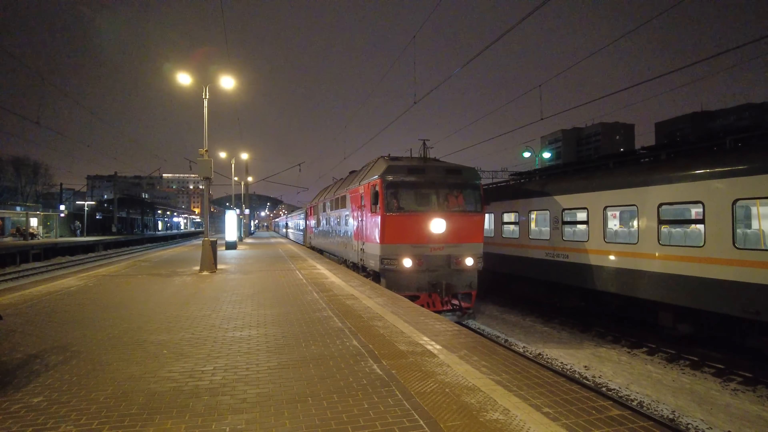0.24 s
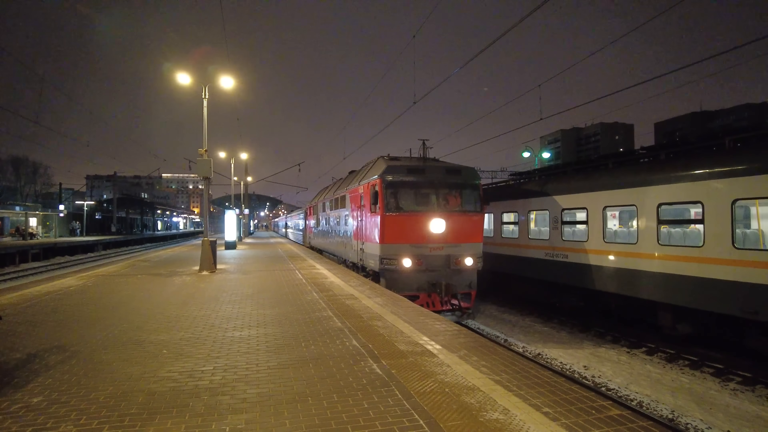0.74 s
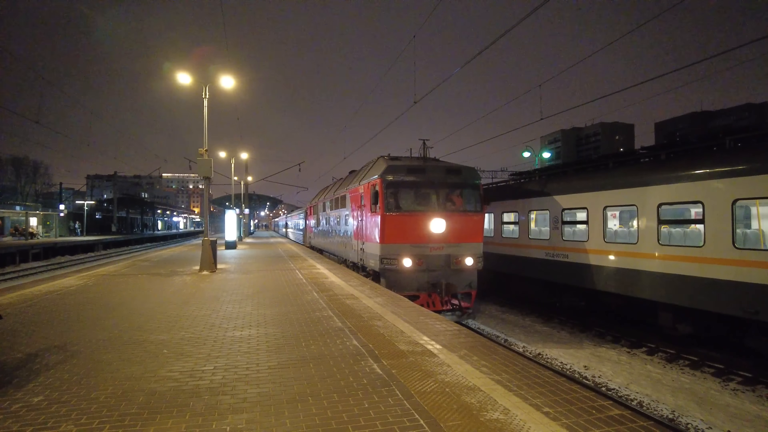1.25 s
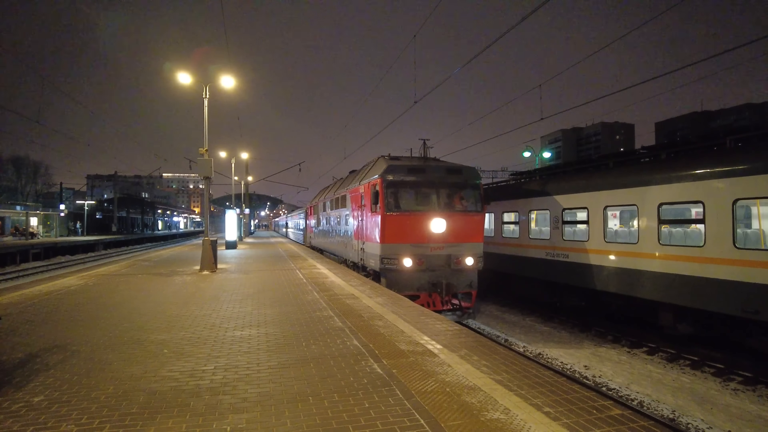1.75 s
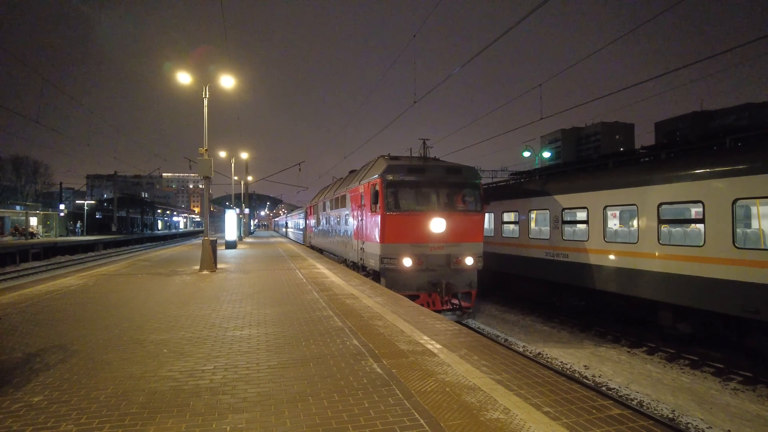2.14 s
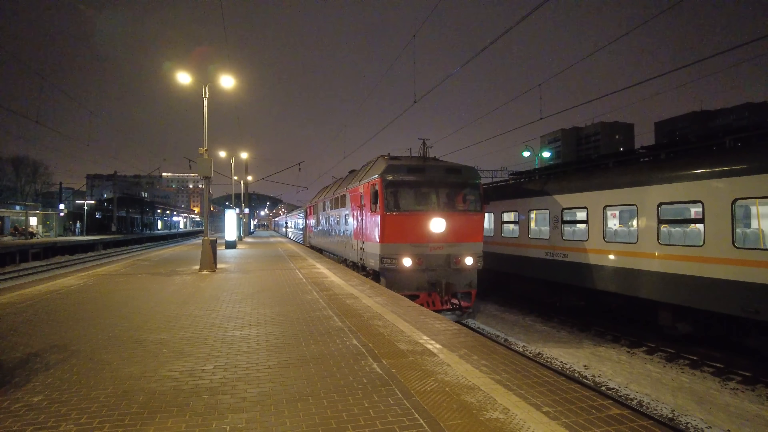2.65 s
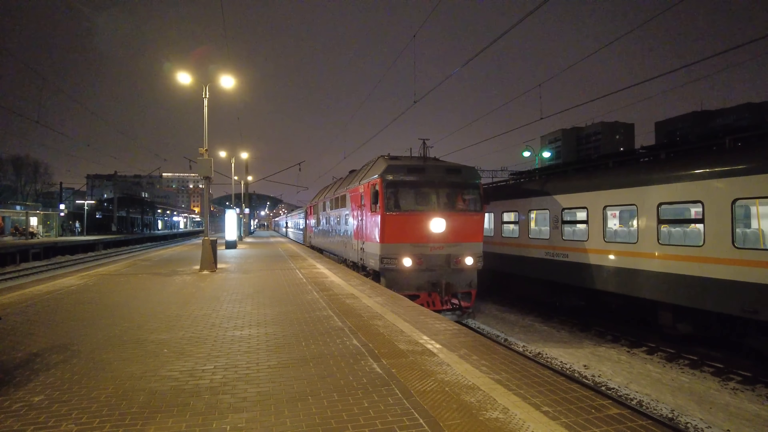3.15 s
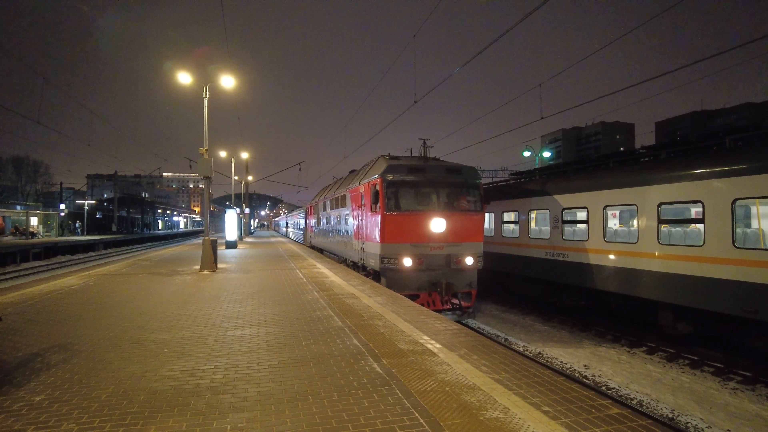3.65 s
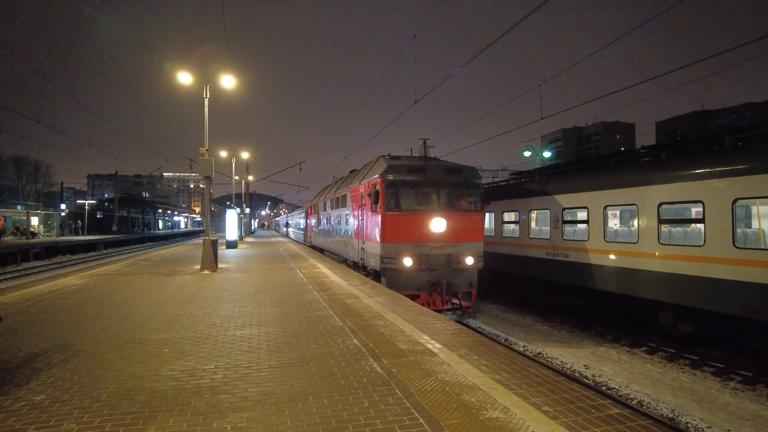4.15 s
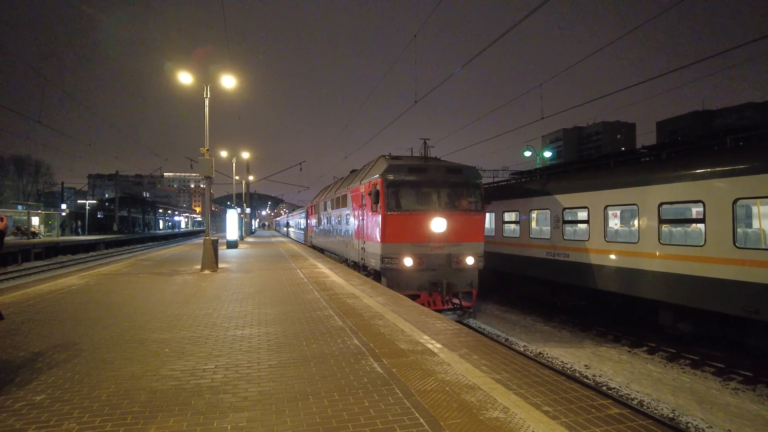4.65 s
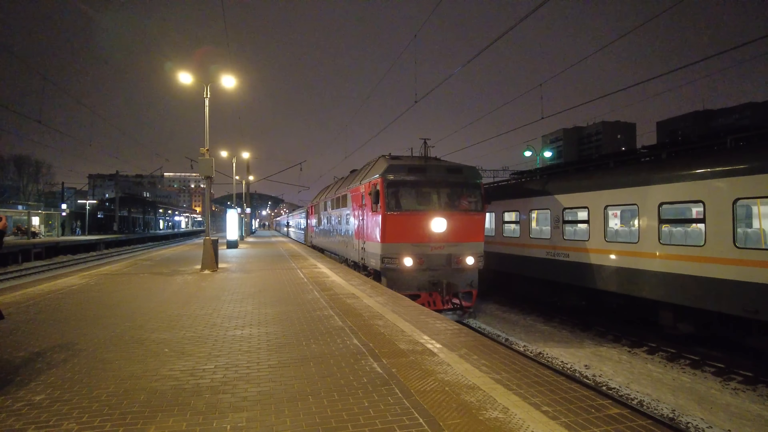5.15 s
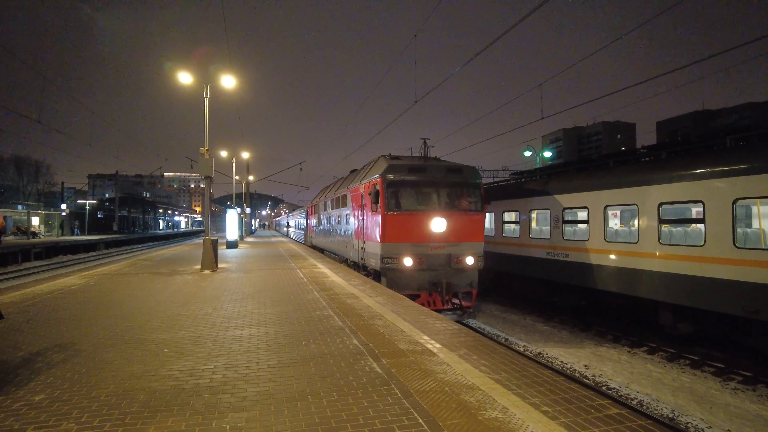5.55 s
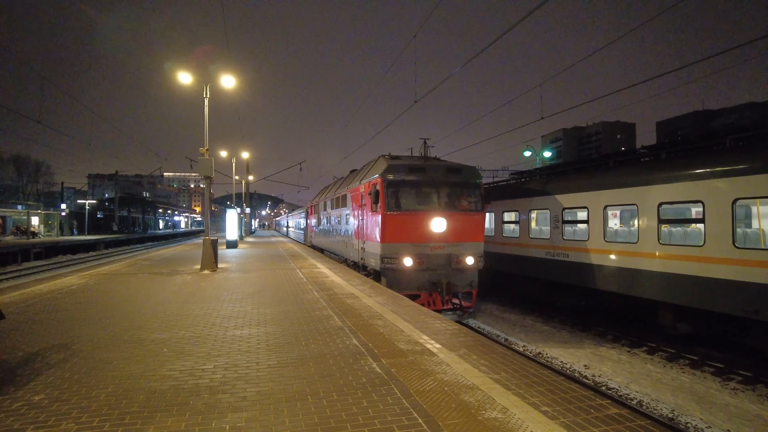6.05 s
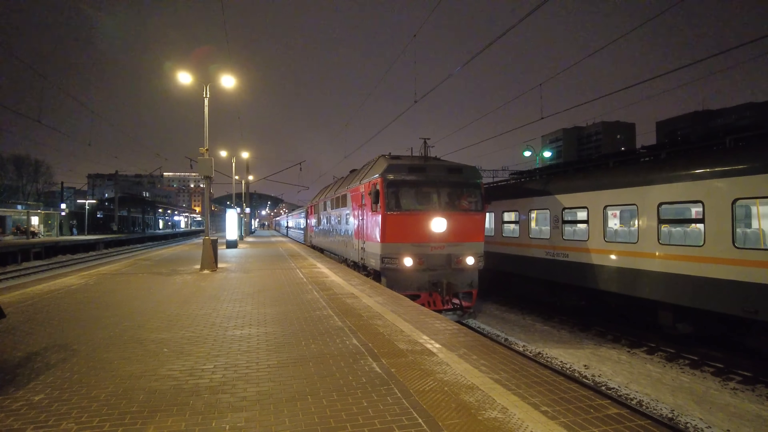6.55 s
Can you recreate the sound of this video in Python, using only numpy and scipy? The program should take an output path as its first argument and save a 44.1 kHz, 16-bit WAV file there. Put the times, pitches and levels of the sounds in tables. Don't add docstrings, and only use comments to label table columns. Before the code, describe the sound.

A diesel locomotive idles with a deep uneven throb while compressed air hisses out early, slowly dying away before scattered valve ticks and puffs.

```python
import sys
import numpy as np
from scipy import signal
from scipy.fft import rfft, irfft
from scipy.io import wavfile
from scipy.ndimage import uniform_filter1d

SR = 44100
rng = np.random.default_rng(int(sys.argv[2]) if len(sys.argv) > 2 else 0)


def transcribe(u):
    v = np.clip(np.atleast_2d(u).T, -1, 1)
    q = np.round(v * 32767).astype(np.int16)
    wavfile.write(sys.argv[1], SR, q)


def how_loud(loudness_db):
    steps = np.asarray(loudness_db, float) / 20
    return 10 ** steps


N = 299880
TIME = np.arange(N) / SR

# (place in firing order, level [dB])
CYLINDERS = [(1, -0.2), (2, 1.5), (3, 0.7), (4, -3.3), (5, -0.3), (6, -0.7), (7, -0.9), (8, 0.9), (9, -2.4),
             (10, 0.5), (11, 2.9), (12, 0.8), (13, 1.5), (14, -1.3), (15, 1.0), (16, -3.2)]
# (frequency [Hz], correlation [0-1])
AIR_LIKENESS = [(60, 0.93), (120, 0.92), (240, 0.75), (480, 0.7), (950, 1), (1890, 0.79), (3770, 0.65),
                (7520, 0.31), (15000, 0.12)]


def evened(x):
    return x / np.sqrt(np.mean(x ** 2) + 1e-20)


def read(points, hz):
    f, value = np.transpose(points)
    return np.interp(np.log(hz + 1), np.log(f + 1), value)


def curves(rows, ahead_s=0):
    s, *columns = np.transpose(rows)
    return [np.interp(TIME + ahead_s, s, column) for column in columns]


def rise(start_s, span_s):
    return 1 - np.exp(-np.maximum(TIME - start_s, 0) / span_s)


def bump(s, half_s):
    return np.exp(-((TIME - s) / half_s) ** 2)


def drift(top_hz):
    hz = np.geomspace(top_hz / 12, top_hz, num=12)[:, None]
    t = np.arange(N // 200 + 2) * 200 / SR
    waves = np.sin(2 * np.pi * (hz * t + rng.random(hz.shape))) / np.sqrt(hz)
    return np.interp(TIME, t, evened(waves.sum(0)))


def resonate(x, hz, width_hz):
    return signal.lfilter(*signal.iirpeak(hz, hz / width_hz, SR), x)


def noise(spectrum, likeness, patchy_db, size=1024):
    frames, hz = 4 * N // size + 5, np.fft.rfftfreq(size, 1 / SR)
    a, b, c, d, patches = rng.standard_normal((5, len(hz), frames))
    patches = uniform_filter1d(patches, size=10, axis=0)
    patches = evened(uniform_filter1d(patches, size=10, axis=1))
    same = np.clip(read(likeness, hz), -1, 1)[:, None]
    left, other = a + 1j * b, c + 1j * d
    z = np.array([left, same * left + np.sqrt(1 - same ** 2) * other])
    z *= how_loud(read(spectrum, hz)[:, None] + patchy_db * patches)
    return evened(signal.istft(z, nperseg=size, noverlap=3 * size // 4)[1][:, :N])


def exhaust(throb, cycles, shaft, speed, fuel_db, heard_db):
    # (multiple of the cycle, level before the surge [dB], level after it [dB])
    weak_orders = [(4, -48, -48), (5, -49, -49), (6, -45, -43), (7, -35, -33), (8, -48, -38),
                   (10, -31.5, -34.5), (11, -40, -50), (12, -32, -37), (14, -47, -34), (15, -33, -38),
                   (16, -41, -37), (17, -33, -40), (18, -35, -45), (19, -41, -45), (20, -38, -34.5),
                   (21, -45, -48), (23, -44, -39), (24, -44.5, -41), (25, -43, -40), (26, -46, -44)]
    # (time [s], half length [s], level [dB])
    hum_swells = [
        (.9, .2, 3),
        (2.5, .2, 4),
        (3.405, .4, 2.5),
        (4.3, .2, 2),
        (5.2, .6, -3.5),
        (6.5, 0.42, -4.5),
    ]
    idle_speed, surge_s = 2.951, 3.9
    phases = np.angle(np.fft.fft(how_loud(np.transpose(CYLINDERS)[1])))

    pulse_db = -27.5 + .3 * fuel_db + 4 * rise(4.75, .1) - 5 * bump(surge_s, 0.67) + 0.69 * drift(3.0)
    bark_db = -42 + 8 * rise(2.8, .1) - 8 * bump(3.8, 0.24) + 1.0 * drift(1.6)
    hum_db = -46 + 61 * (speed - idle_speed) + 1.5 * drift(3.5)
    hum_db += sum(db * bump(s, half_s) for s, half_s, db in hum_swells)

    out = how_loud(hum_db) * np.cos(2 * np.pi * 50 * shaft + .5 * drift(5.0))
    out += how_loud(-17.5 + heard_db) * np.cos(2 * np.pi * 9 * throb + phases[9])
    for k, db in ((13, pulse_db), (22, bark_db)):
        out += how_loud(db) * np.cos(2 * np.pi * k * cycles + phases[k % 16])

    surge = bump(surge_s, .75)
    late = np.cumsum(surge) / surge.sum()
    unrest = 1 + 2.2 * surge
    for k, early_db, late_db in weak_orders:
        db = early_db + late * (late_db - early_db) + 0.36 * heard_db
        angle = 2 * np.pi * k * cycles + phases[int(k) % 16] + .35 * unrest * drift(2.5)
        out += how_loud(db + 1.4 * unrest * drift(3.0)) * np.cos(angle)
    return np.sqrt(2) * out


def roar(cycles, fuel_db):
    # (frequency [Hz], density [dB per Hz])
    rumble_spectrum = [(44, -18.5), (75, -1), (92, -9), (129, -7), (167, -11), (208, -8), (263, -11),
                       (312, -16.5), (331, -18), (363, -20.5), (399, -24), (453, -20.5), (704, -26),
                       (908, -24.5), (1200, -30), (1560, -55.5), (2640, -120)]
    # (frequency [Hz], density [dB per Hz])
    clatter_spectrum = [(530, -12), (900, -1.5), (1100, -17.5), (1150, -10.5), (1310, -7), (1490, -10),
                        (1620, -8.5), (2330, -24.5), (2950, -20), (3440, -29), (3960, -29), (5350, -36.5),
                        (5700, -31), (6920, -49), (7500, -43.5), (9750, -79), (16500, -120)]
    # (frequency [Hz], correlation [0-1])
    engine_likeness = [(60, 1), (120, 0.92), (240, 0.94), (480, 0.73), (950, 0.37), (1890, 0.95),
                       (3770, 0.15), (7520, 0.091), (15000, 0.17)]
    # (time [s], roar level [dB], low rumble level [dB])
    puffs = [(.1, 3, 2.5), (.32, -5, -1.5), (.55, 3, -3), (.75, -0.5, 1.5), (1.14, 3, -0.5),
             (1.25, -1, 0.5), (1.5, 1, 0), (1.97, 3.5, 1), (2.11, 3.5, 1), (2.32, 2, -1.5), (2.45, 0.3, 2),
             (2.77, 0.5, -0.3), (2.98, -0.5, 2.5), (3.22, 6.5, 0), (3.32, 2, 3), (3.42, 4, 6),
             (3.65, -1.5, 2.5), (4.0, 2.5, 0), (4.15, 3, -1.5), (4.37, -1.5, -2), (4.6, -6.5, 0.5),
             (4.8, 1, 2.5), (5.1, 0, 5), (5.3, 1, 0), (5.74, 1, 4.5), (5.98, 4.5, -2.2), (6.17, 3, 1.5),
             (6.4, -1, 2.5)]
    puff_s = 0.05
    roar_db = 0.32 * fuel_db + sum(db * bump(s, puff_s) for s, db, _ in puffs)
    low_db = 0.11 * fuel_db + sum(db * bump(s, puff_s) for s, _, db in puffs)

    firing = 16 * cycles
    strength_db = np.transpose(CYLINDERS)[1][firing.astype(int) % 16]
    beat = how_loud(1.6 * strength_db) * np.exp(-(firing % 1) / .6)
    beat = uniform_filter1d(beat, size=150)

    rumble = noise(rumble_spectrum, engine_likeness, 2.05, size=2048)
    low = signal.sosfiltfilt(signal.butter(2, 330, fs=SR, output="sos"), rumble)
    high = rumble - low
    rumble = low * how_loud(low_db - low_db.mean()) + high * how_loud(roar_db - roar_db.mean())
    rattle = noise(clatter_spectrum, engine_likeness, 1.72)
    return how_loud(-35.5) * rumble * (1 + 0.41 * beat) + how_loud(-45.5) * rattle * (1 + 0.19 * beat)


def knock(cycles):
    # (frequency [Hz], width [Hz], level [dB])
    block_modes = [
        (540, 160, 7.5),
        (891, 42, 10.5),
        (1460, 150, 3),
    ]
    firing = (16 * cycles + .25 * drift(40.0)).astype(int)
    at = np.flatnonzero(np.diff(firing) > 0)
    strength_db = 1.5 * np.transpose(CYLINDERS)[1][firing[at] % 16]
    impacts = np.zeros(N)
    impacts[at] = how_loud(strength_db + 2.4 * rng.standard_normal(len(at)))
    impacts = signal.sosfilt(signal.butter(4, 2200, fs=SR, output="sos"), impacts)
    rung = evened(sum(how_loud(db) * resonate(impacts, hz, width_hz) for hz, width_hz, db in block_modes))
    echoes = np.array([np.roll(rung, round(s * SR)) for s in (.009, .013)])
    return how_loud(-58) * (rung + 0.74 * echoes)


def hard_raps():
    # (time [s], peak level [dB])
    hardest = [(0.071, -32), (0.568, -33), (0.798, -31), (1.57, -34), (1.647, -34), (1.768, -34),
               (1.923, -33), (2.017, -35), (2.091, -31), (2.322, -34), (2.475, -31), (2.55, -35),
               (2.596, -34), (2.938, -34), (3.002, -35), (3.079, -34), (3.324, -33), (3.465, -30),
               (3.683, -34), (3.794, -36), (3.855, -36), (3.966, -32), (4.275, -36), (4.511, -34),
               (4.785, -36), (4.895, -34), (5.005, -35), (5.306, -36), (5.374, -35), (5.622, -33),
               (5.73, -34), (5.939, -33), (5.99, -30), (6.056, -33), (6.166, -32), (6.634, -35)]
    trim_db, mode_hz, width_hz = -.8, 720, 600
    clicks = np.zeros(N)
    for s, db in hardest:
        clicks[round(s * SR)] = -how_loud(db + trim_db)
    clicks = signal.sosfilt(signal.butter(4, 1900, fs=SR, output="sos"), clicks)
    rung = resonate(resonate(clicks, mode_hz, width_hz), mode_hz, 2 * width_hz)
    first_peak = abs(rung[:round(hardest[1][0] * SR)]).max()
    return rung * how_loud(hardest[0][1] + trim_db) / first_peak


def gears(shaft):
    # (multiple of the shaft cycle, level before the surge [dB], level after it [dB])
    meshes = [(75.4, -53, -49), (92.1, -50.5, -48), (103.5, -52.5, -54), (125.2, -56, -56),
              (184.3, -59, -62), (276.4, -56.5, -66), (368.6, -68, -58.5)]
    # (multiple of the shaft cycle, time [s], half length [s], level [dB])
    sings = [
        (276.4, 1.05, .35, 1.2),
        (276.4, 2.1, .3, 1.5),
        (368.6, 4.65, .35, 3),
        (368.6, 5.25, .2, -6),
        (368.6, 5.95, .45, 4),
        (92.1, 5.3, .5, 2.5),
    ]
    surge_end_s = 3.74
    late = np.clip(TIME - surge_end_s + .5, 0, 1)
    tones = 0
    for k, early_db, late_db in meshes:
        db = early_db + late * (late_db - early_db) + 2.6 * drift(12.0)
        for which, s, half_s, more_db in sings:
            if abs(which / k - 1) < .1:
                db += more_db * bump(s, half_s)
        angle = 2 * np.pi * (k * shaft + rng.random()) + .95 * drift(14.0)
        tones += how_loud(db) * np.cos(angle)
    return np.sqrt(2) * tones


def air():
    # (frequency [Hz], density [dB per Hz])
    jet_spectrum = [(3000, -30), (4600, -3), (6200, -2), (6900, -8), (9300, -8), (10900, -5), (11700, -7),
                    (12500, -5), (13400, -9), (15000, -11), (16000, -13)]
    # (frequency [Hz], density [dB per Hz])
    hiss_spectrum = [(590, -37), (1000, -15.5), (1190, -9.5), (1390, -4.5), (1510, -5), (1640, 0),
                     (1800, -8), (1870, -15), (2100, -11.5), (3090, -7.5), (3570, -13), (4260, -9.5),
                     (5130, -18), (6130, -17.5), (7500, -33), (9750, -43), (16500, -120)]
    # (frequency [Hz], density [dB per Hz])
    spit_spectrum = [(3000, -20.5), (4500, -2), (5400, 2.5), (6300, -3.5), (7000, -7.5), (13000, -16),
                     (16000, -23.5)]
    # (frequency [Hz], correlation [0-1])
    jet_likeness = [(3000, .6), (5200, .5), (8200, 0.45), (11500, 0.24), (14200, .6)]
    # (frequency [Hz], width [Hz], level [dB], share of each swell)
    pipe_modes = [
        (1437, 44, 13, .2),
        (1600, 58, 10.5, 1.4),
        (1747, 17, 12, 1),
        (1942, 17, -8, .8),
    ]
    # (time [s], level [dB])
    swells = [
        (1.25, 2.7),
        (1.5, 2.5),
        (3.2, 2.5),
    ]
    crack_s, wide_s = 0.38, 0.6
    drain_s, knee_s, drain_db_per_s = 1.76, 0.63, 7.5
    swell_s, spit_t60_s = 0.18, 2.8

    drop_db = -drain_db_per_s * knee_s * np.logaddexp(0, (TIME - drain_s) / knee_s)
    crack, wide = rise(crack_s, 0.032), rise(wide_s, 0.36)
    cracked = how_loud(-10)
    flow = (cracked * crack + (1 - cracked) * wide) * how_loud(0.23 * drift(13.0))

    spit_db = -53 - 60 * np.maximum(TIME - crack_s, 0) / spit_t60_s
    spit = crack * how_loud(spit_db) * noise(spit_spectrum, jet_likeness, 1.5)

    swell_db = sum(db * bump(s, swell_s) for s, db in swells)
    filled = how_loud(-23.5) * crack + rise(wide_s, 0.32)
    drive = noise([(900, -2), (2500, 10), (4000, -35)], AIR_LIKENESS, 0.3)
    ring = 0
    for hz, width_hz, db, share in pipe_modes:
        ring += how_loud(db + share * swell_db) * resonate(drive, hz, width_hz)
    ring = how_loud(-43 + 0.47 * drop_db) * filled * evened(ring)

    hiss = how_loud(-42 + 0.69 * drop_db) * noise(hiss_spectrum, AIR_LIKENESS, 0.86)
    jet = noise(jet_spectrum, jet_likeness, 0.93)
    middle = jet.mean(0)
    jet = middle + (jet - middle) * how_loud(np.minimum(-.22 * drop_db, 4.0))
    return flow * (how_loud(-50 + drop_db) * jet + hiss) + ring + spit


def ticks():
    # (time [s], peak level [dB], upper ring relative to it [dB])
    events = [(0.0842, -54, -21.5), (0.171, -54, -22), (0.3072, -59, -14), (3.9843, -62, -17),
              (4.147, -59, -22), (4.9277, -46.5, -24), (5.006, -53.5, -17), (5.0873, -51, -24),
              (5.2664, -49, -20), (5.5223, -51, -19), (5.6577, -58, -16), (5.8381, -58, -15.5),
              (5.8894, -57, -18), (5.9693, -56, -15.5), (6.147, -54.5, -21), (6.3101, -59, -16),
              (6.3649, -56, -19.5), (6.4043, -51.5, -21), (6.4517, -53, -26), (6.4996, -53.5, -18),
              (6.5694, -58, -19), (6.6084, -53, -21), (6.6424, -50, -17), (6.6844, -52, -17),
              (6.7483, -47.5, -20)]
    # (frequency [Hz], width [Hz], level [dB])
    body_modes = [
        (2620, 250, -7),
        (3120, 260, 3),
        (4300, 450, -12),
        (5700, 300, 11.5),
        (6350, 220, 3),
    ]
    t60_s = 0.055
    low, high, t = np.zeros(N), np.zeros(N), np.arange(6000) / SR
    for s, db, upper_db in events:
        at = round(s * SR)
        decay = how_loud(db - 60 * np.maximum(t - .02, 0) / t60_s)
        puff = (decay * np.minimum(t / .004, 1))[:N - at]
        low[at:at + len(puff)] += puff
        high[at:at + len(puff)] += how_loud(upper_db) * puff
    drive = noise([(1000, 0.0034), (9000, 0.0011)], AIR_LIKENESS, .5)
    rung = 0
    for hz, width_hz, db in body_modes:
        envelope = low if hz < 5000 else high
        once = resonate(envelope * drive, hz, width_hz)
        rung += how_loud(db) * resonate(once, hz, 2 * width_hz)
    return how_loud(8.5) * rung


def clacks():
    # (time [s], peak level [dB])
    events = [
        (5.548, -52),
        (5.6994, -48),
        (5.892, -52),
        (5.985, -50),
        (6.2291, -47),
        (6.565, -51.5),
    ]
    ring_hz, width_hz, puff_s = 3900, 700, .013
    puffs = sum(how_loud(db) * bump(s + puff_s, puff_s) for s, db in events)
    left, other = rng.standard_normal((2, N))
    drive = np.array([left, .6 * left + .8 * other]) * puffs
    return how_loud(3.0) * resonate(resonate(drive, ring_hz, width_hz), ring_hz, 2 * width_hz)


def lamps():
    # (frequency [Hz], level [dB])
    ballasts = [
        (14950, -94),
        (14420, -101),
    ]
    # (time [s], half length [s], level [dB])
    falter = (5.8, .25, -12)
    # (frequency [Hz], correlation [0-1])
    city_likeness = [(4500, .2), (8000, .02), (15000, .1)]
    s, half_s, gap_db = falter
    whines = 0
    for hz, db in ballasts:
        level = how_loud(db + gap_db * bump(s, half_s) + 2.5 * drift(4.0))
        whines += level * np.sqrt(2) * np.sin(2 * np.pi * hz * TIME)
    city_spectrum = [(4500, -30), (6500, 0), (12500, -2), (13500, -6), (16000, -8)]  # (Hz, dB per Hz)
    return whines + how_loud(-77) * noise(city_spectrum, city_likeness, 1.5)


def leaned(x):
    # (frequency [Hz], left over right [dB])
    balance = [(27, -3.9), (45, -3), (75, -1.5), (110, -.3), (400, .6), (1300, .5), (4400, 0),
               (15000, -1.4)]
    padded = np.pad(x, ((0, 0), (SR, SR)), "reflect")
    tilt = how_loud(read(balance, np.fft.rfftfreq(N + 2 * SR, 1 / SR)) / 2)
    return irfft(rfft(padded) * np.array([tilt, 1 / tilt]), N + 2 * SR)[:, SR:SR + N]


def scene():
    # (time [s], speed [cycles/s], fuel [dB])
    governor = [(0, 2.9547, -.4), (.8, 2.9507, .1), (1.5, 2.9523, .1), (2, 2.9492, -1.1), (2.5, 2.9497, .1),
                (3.15, 2.9589, 1), (3.55, 3.0275, 2), (3.9, 3.0341, -1.9), (4.6, 2.9483, -2.8),
                (5, 2.913, 1.3), (5.5, 2.9014, -1.7), (6, 2.9129, .1), (6.4, 2.9126, .9), (6.8, 2.922, 2.8)]
    # (frequency [Hz], width [Hz], depth [0-1])
    ground_notch = (1180, 150, .5)
    heard_speed, heard_db = curves(governor)
    speed, fuel_db = curves(governor, ahead_s=.2)
    throb = .022 + np.cumsum(heard_speed) / SR
    cycles = .018 + np.cumsum(speed) / SR
    shaft = 1.004 * cycles

    direct = exhaust(throb, cycles, shaft, heard_speed, fuel_db, heard_db)
    direct = direct + roar(cycles, fuel_db) + knock(cycles) + hard_raps() + gears(shaft)
    direct = direct + air() + ticks() + clacks() + lamps()
    hz, width_hz, depth = ground_notch
    return leaned(direct - np.clip(depth, 0, 1) * resonate(direct, hz, width_hz))


def roll_off(x):
    return signal.sosfilt(signal.butter(12, 15720, fs=SR, output="sos"), x)


def record(dry):
    gate_hz, gate_db = 12800, -108.5
    hz, _, z = signal.stft(np.pad(dry, ((0, 0), (2048, 2048)), "edge"), SR, nperseg=2048)
    power = (abs(z[:, 1:]) ** 2).mean(0)
    bands = power.reshape(32, 32, -1).mean(1)
    band_db = np.repeat(10 * np.log10(bands + 1e-20), 32, axis=0)
    z[:, 1:] *= (band_db > gate_db) | (hz[1:, None] < gate_hz)
    kept = signal.istft(z, SR, nperseg=2048)[1][:, 2048:2048 + N]
    return roll_off(kept)


dry = scene()
out = record(dry)
transcribe(out)
```